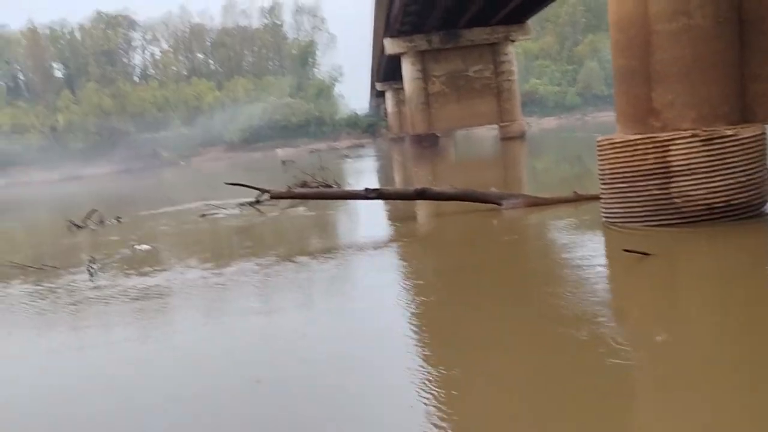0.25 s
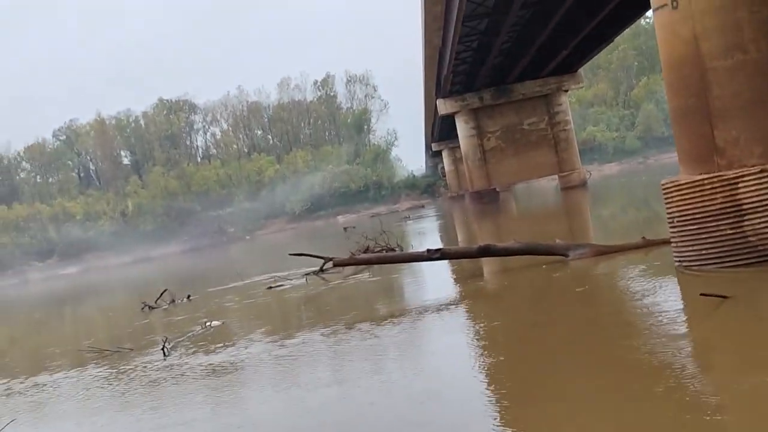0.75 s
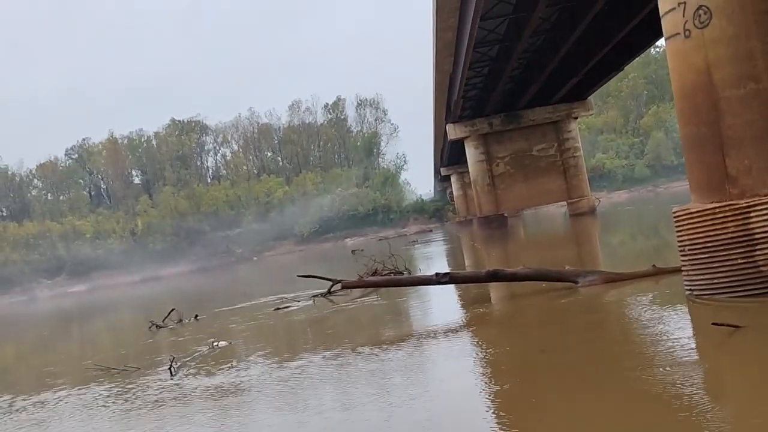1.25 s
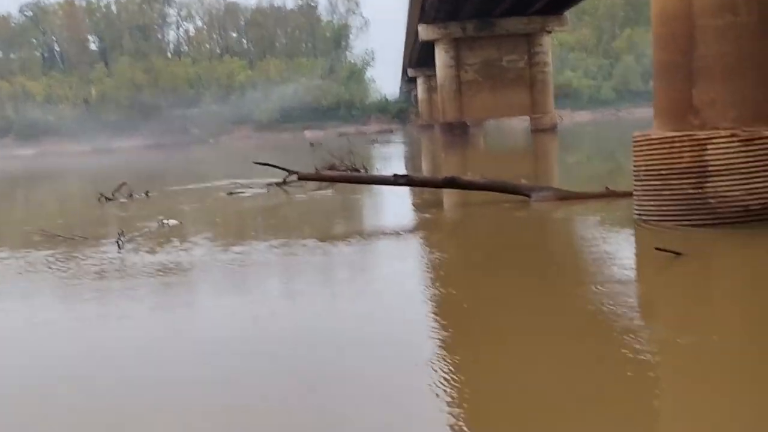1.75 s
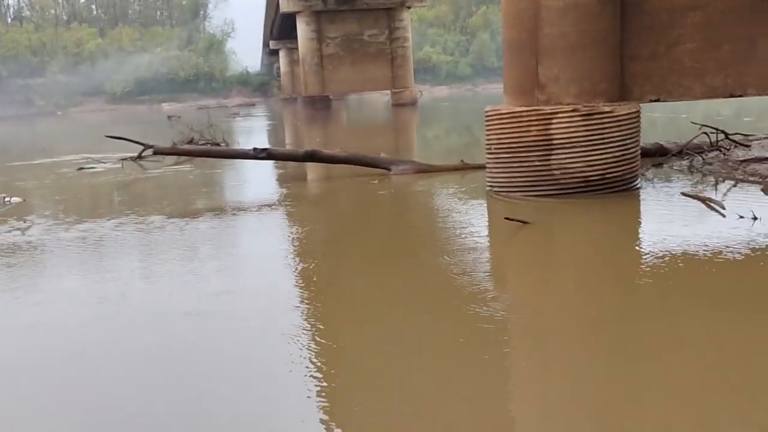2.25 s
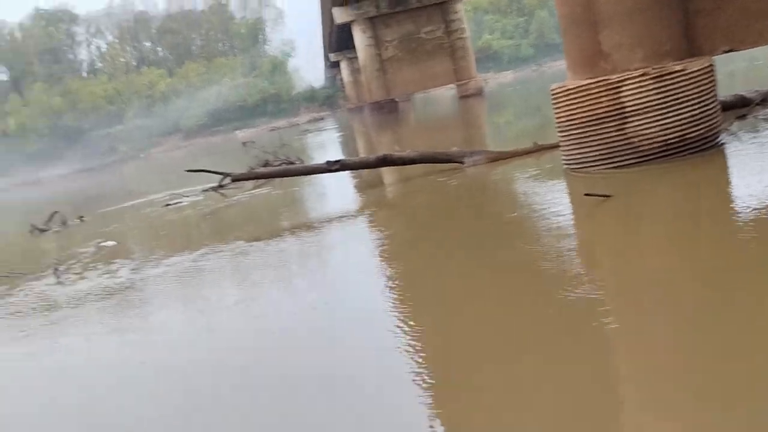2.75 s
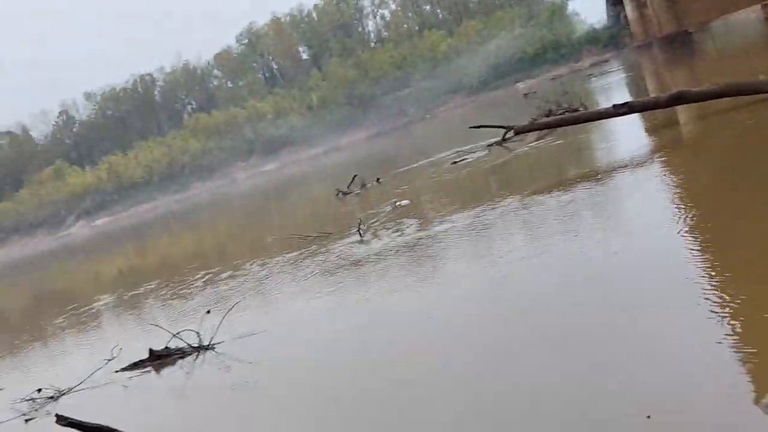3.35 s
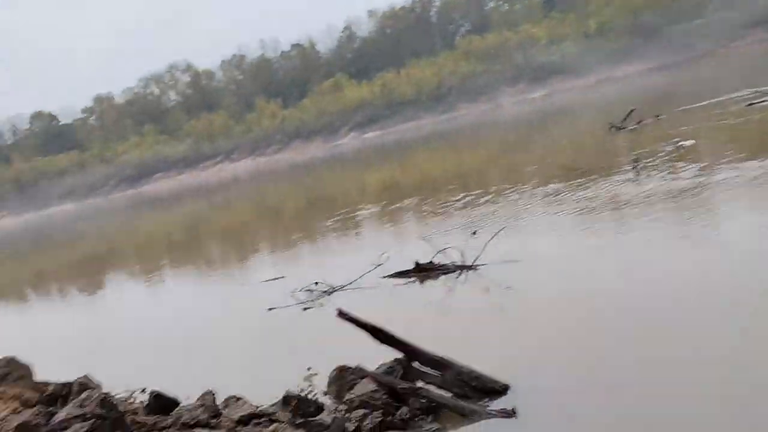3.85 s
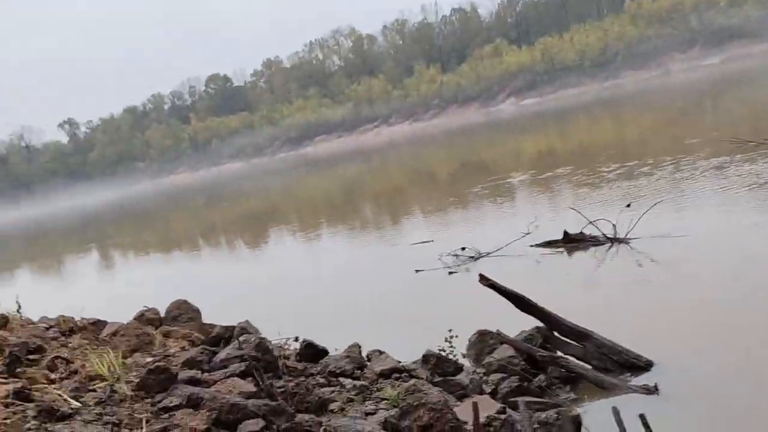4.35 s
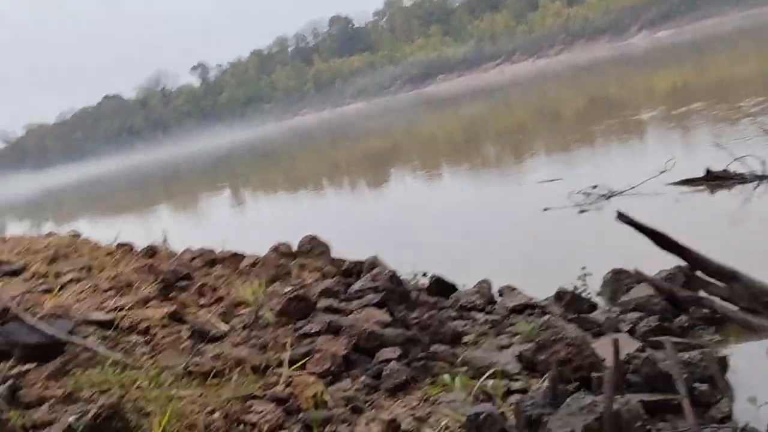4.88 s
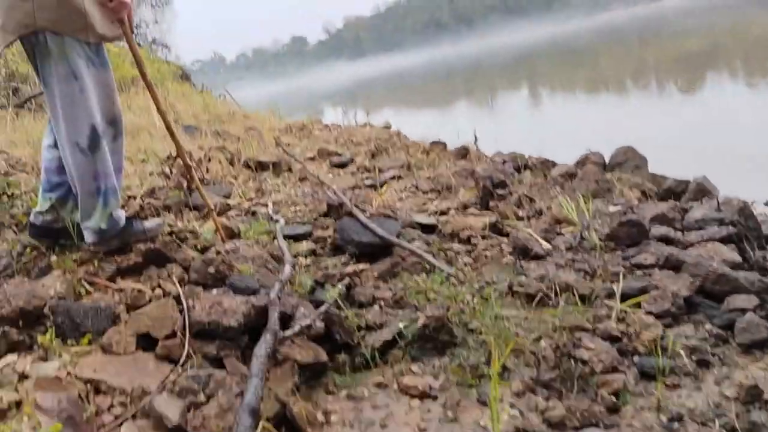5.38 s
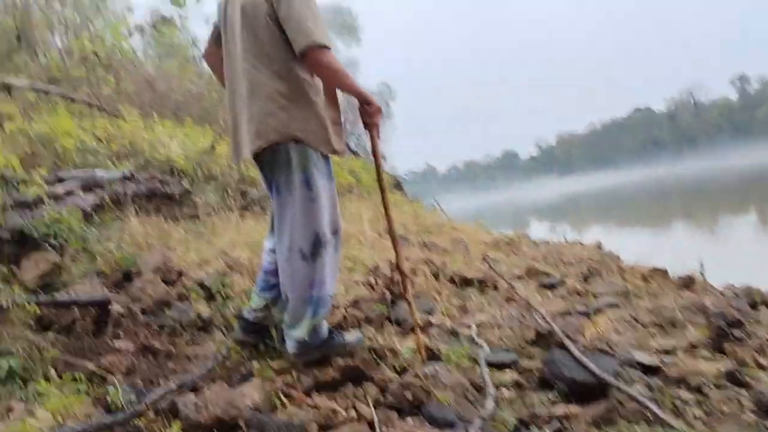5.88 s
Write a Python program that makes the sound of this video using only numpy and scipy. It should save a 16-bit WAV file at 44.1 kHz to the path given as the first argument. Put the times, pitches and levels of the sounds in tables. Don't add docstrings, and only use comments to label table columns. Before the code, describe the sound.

Deep hollow rumble and tyre hum of a truck passing on a bridge, fading away; near the end, sharp dull knocks on rocks close by.

```python
import sys
import numpy as np
from scipy import signal
from scipy.fft import rfft, irfft, next_fast_len
from scipy.io import wavfile
from scipy.ndimage import uniform_filter1d, minimum_filter1d

SR = 44100
rng = np.random.default_rng(int(sys.argv[2]) if len(sys.argv) > 2 else 0)


def elevation(decibels):
    levels = np.asarray(decibels, float)
    return 10 ** (levels / 20)


def transcribe(signal):
    frames = np.atleast_2d(signal).T
    limited = np.clip(frames, -1, 1)
    pcm = np.round(limited * 32767).astype(np.int16)
    wavfile.write(sys.argv[1], SR, pcm)


N = 269945
PORT_LAG_S = 0.00029


def curves(table):
    s, *columns = np.transpose(table)
    return [np.interp(np.arange(N) / SR, s, c) for c in columns]


def on_log(hz, points):
    f, v = np.transpose(points)
    return np.interp(np.log(hz), np.log(f), v)


def walk(rate):
    steps = np.repeat(rng.standard_normal(int(N / SR * rate) + 2), 8)
    smooth = uniform_filter1d(uniform_filter1d(steps, size=8), size=8)
    return 1.3 * np.interp(np.arange(N) * (8 * rate / SR), np.arange(len(steps)), smooth)


# (frequency [Hz], share in common [0-1])
PORT_LIKENESS = [(30, .96), (70, .99), (200, .97), (400, 0.97), (700, 0.83), (1400, 0.29), (2500, 0.037),
                 (5000, 0.14)]
# (frequency [Hz], left minus right [dB])
PORT_BALANCE = [(400, 0), (800, 2), (2400, -1), (5500, 0), (7000, -4.5), (8800, -28), (11000, -68),
                (14500, -49)]


def ports(left, other, hz):
    share = np.clip(on_log(hz, PORT_LIKENESS), 0, 1)
    right = share * left + np.sqrt(1 - share ** 2) * other
    pan = elevation(on_log(hz, PORT_BALANCE))
    late = np.exp(-2j * np.pi * hz * PORT_LAG_S)
    return np.array([left * pan * late, right]) * np.sqrt(2 / (1 + pan ** 2))


# (lower edge [Hz], upper edge [Hz])
BANDS_HZ = [(25, 56), (64, 180), (220, 420), (720, 900), (1200, 2800), (3900, 5800), (7600, 11000)]
# (time [s], level against the closest moment [dB])
NEARNESS = [(0, -9), (.12, -6), (.3, -3), (.6, -3), (.9, -.5), (1.55, 0), (1.9, -0.5), (2.6, -1.5),
            (3.1, -3.5), (3.6, -5.5), (4.2, -8), (4.5, -11.5), (5.0, -15.5), (5.5, -17), (6.12, -22)]
# (level at the closest [dB], share of nearness, drift [dB per s],
# distant floor [dB], share of puffs)
LAYERS = [
    (-52.5, .1, -2, -80, 0),
    (-25, 0.27, -1.81, -60, 0),
    (-25.5, 0.86, -0.58, -71, 0),
    (-36.5, 0.99, 0.25, -71, 0.0033),
    (-37, 1.145, -0.88, -54, 0.22),
    (-50, 0.84, -1.05, -72.5, 0.55),
    (-43.2, 1.74, -0.97, -70.5, 1.27),
]
# (time [s], boom level [dB])
JOINTS = [(.14, -24), (.3, -19.5), (.36, -15), (.42, -17), (.52, -16.5), (.68, -13.5), (.75, -16.5),
          (.81, -19), (.89, -22), (.98, -23), (1.33, -22), (1.5, -40), (1.6, -27), (1.98, -34), (2.2, -25),
          (2.52, -46), (2.71, -37), (2.88, -33), (3.07, -31), (3.51, -25.5), (4.04, -31), (4.28, -32.5),
          (4.41, -35), (4.51, -39), (4.59, -42), (4.67, -29), (5.05, -36), (5.51, -36), (5.85, -43)]
JOINT_DB = [-39.5, -1.8, -16.5]
# (time [s], change [dB], centre [Hz], breadth [octaves])
SCREENS = [(2.815, -6, 9550, 0.77), (3.89, -3, 4306, 2.9), (4.7, -4.5, 254, 0.64), (4.2, 2.6, 800, .4),
           (5.1, -2.5, 800, .4)]
# (time [s], lift [dB], length [s])
PUFFS = [(3.35, 1.5, .12), (.3, -1.5, .1), (1.59, 2, 0.35), (.8, -0.5, 0.065), (2.35, 1.5, 0.055),
         (2.6, 2, 0.046), (2.76, 1, 0.046), (3.8, 3.5, 0.13), (4.194, 2, 0.13), (4.599, 3.5, .06),
         (4.9, 7, 0.031), (5.426, 7, 0.21), (6.052, 2, 0.084)]


def layer_levels():
    joint_s, screen_s = 0.039, 0.013
    every = 32
    t = np.arange(0, N, every) / SR
    near, = curves(NEARNESS)
    jolts = sum(elevation(2 * db) * np.exp(-((t - s) / joint_s) ** 2) for s, db in JOINTS)
    puffs = sum(db * np.exp(-((t - s) / length) ** 2) for s, db, length in PUFFS)
    levels = []
    for k, (db, follow, drift_db, floor_db, puffy) in enumerate(LAYERS):
        octave = np.log2(BANDS_HZ[k]).mean()
        screen = 0
        for s, change_db, hz, breadth in SCREENS:
            touched = np.exp(-((octave - np.log2(hz)) / breadth) ** 2)
            passed = (1 + np.tanh((t - s) / screen_s)) / 2
            screen = screen + change_db * touched * passed
        truck_db = db + follow * near[::every] + drift_db * t + screen
        power = elevation(2 * truck_db) + elevation(2 * floor_db)
        if k < len(JOINT_DB):
            power = power + jolts * elevation(2 * JOINT_DB[k])
        level_db = 10 * np.log10(power) + puffy * puffs
        levels.append(np.interp(np.arange(N) / SR, t, level_db))
    return levels


# (frequency [Hz], level [dB per Hz])
ROAD_COLOUR = [(15, -26), (25, -42), (38, -29), (50, -40), (58, -15), (66, -15.5), (85, -7), (139, -6.5),
               (180, -7.5), (290, -9), (510, -14), (620, -20), (1000, -22), (1150, -28),
               (1500, -28), (2000, -31.5), (2900, -39), (3700, -49.5), (5800, -51), (7200, -47.5), (8900, -40.5),
        (10200, -48), (12500, -57), (14300, -59.5), (17000, -66)]
# (frequency [Hz], width [Hz], level over the rumble [dB])
GIRDERS = [(96.6, 14, 2), (121, 12, 4.5), (152, 5, 3), (298, 9, 9), (431, 25, 2)]


def road():
    size = next_fast_len(N)
    hz = np.maximum(np.arange(size // 2 + 1) * SR / size, 1)
    gain = elevation(on_log(hz, ROAD_COLOUR))
    for f, width, db in GIRDERS:
        gain = gain * (1 + (elevation(db) - 1) / (1 + (2 * (hz - f) / width) ** 2))
    noise = ports(*rfft(rng.standard_normal((2, size))), hz) * gain
    power = np.mean(np.abs(noise) ** 2, axis=0) / size ** 2
    out, gust = 0, walk(9)
    for k, db in enumerate(layer_levels()):
        lo, hi = BANDS_HZ[k]
        rms = np.sqrt(2 * power[(hz > lo) & (hz < hi)].sum())
        share = on_log(hz, [(edge, j == k) for j, band in enumerate(BANDS_HZ) for edge in band])
        flicker_db = 0.72 * walk(12) + 0.056 * k * gust
        out = out + irfft(noise * share, size)[:, :N] * elevation(db + flicker_db + 1) / rms
    return out


def smeared_line(hz, spread, rate=40, flutter_db=3):
    level = np.sqrt(2) * elevation(flutter_db * walk(25))
    cycles = np.cumsum(hz * (1 + spread * walk(rate))) / SR
    return level * np.sin(2 * np.pi * (cycles + rng.random()))


# (time [s], pitch [Hz], level [dB], octave level [dB])
TREAD = [(0, 557.3, -49, -68), (.55, 543.9, -39, -45), (1, 524, -34, -40), (1.5, 511.7, -33, -39),
         (2, 505.7, -33.5, -40), (2.4, 504, -35, -56), (2.7, 502, -29, -58), (2.9, 502, -36, -60),
         (3.1, 510, -33, -60), (3.45, 500, -37, -56), (3.58, 473, -45, -43), (3.8, 473, -44, -47),
         (3.95, 474, -43, -54), (4.2, 475.8, -36, -55), (4.4, 475, -49, -53), (4.7, 474, -48, -47),
         (4.85, 474, -44, -49), (5.0, 476, -37.5, -49), (5.2, 476, -37.5, -51), (5.35, 475, -46, -53),
         (5.55, 474, -43, -53), (5.8, 474, -45, -56), (6.12, 472, -55, -64)]


def tread():
    hz, db, octave_db = curves(TREAD)
    spread_near, spread_far, agree_s, agree_within_s = .04, 0.008, 2.45, 0.129
    t = np.arange(N) / SR
    spread = spread_far + (spread_near - spread_far) / (1 + np.exp((t - agree_s) / agree_within_s))

    def with_echoes(pitch, spread, flutter_db):
        return sum(elevation(-7 * k) * smeared_line(pitch, spread, flutter_db=flutter_db) for k in range(3))

    hum = with_echoes(hz, spread, 2.8) * elevation(db - 3.3)
    octave = [with_echoes(2 * hz, .9 * spread, 3) * elevation(octave_db - 1.5) for _ in range(2)]
    return np.array([np.roll(hum, int(PORT_LAG_S * SR)), hum]) + octave


# (time [s], level [dB], left minus right [dB])
WHISTLE = [(0, -57.5, -17), (.3, -56, -20), (.7, -48.5, -14), (1.1, -45, -5), (1.5, -51, -12.5),
           (2.1, -56.5, -11), (2.7, -64.5, -6), (3.6, -66, -4), (3.75, -76, -2), (3.95, -68.5, -4),
           (5.1, -73, -3), (6.12, -82, -3)]


def whistle(count=9):
    far_hz, drop_least, drop_most = 6225, .1, .185
    first_s, last_s, sweep_s = .62, 1.15, .52
    early_db, far_spread = -4, .0075
    rev_share, rev_s = .008, 3.85
    db, pan_db = curves(WHISTLE)
    t, out = np.arange(N) / SR, np.zeros((2, N))
    rev = 1 + rev_share * (1 + np.tanh((t - rev_s) / .15)) / 2
    for k, late in enumerate(np.linspace(0, 1, 2 * count)):
        ahead = (first_s + late * (last_s - first_s) - t) / sweep_s
        drop = drop_least + (drop_most - drop_least) * late ** .7
        hz = far_hz * rev * (1 + drop * (1 + ahead / np.sqrt(1 + ahead ** 2)) / 2)
        spread = far_spread + 0.013 / (1 + ahead ** 2)
        out[k % 2] += elevation(early_db * (1 - late)) * smeared_line(hz, spread, rate=150)
    return out / np.sqrt(count) * elevation(db + 2.6 + np.array([pan_db, -pan_db]) / 2)


def add(out, s, sound, pan_db):
    i = int(s * SR)
    panned = sound * elevation(np.array([[pan_db], [-pan_db]]) / 2)
    out[:, i:i + sound.shape[-1]] += panned[:, :N - i]


def crack(hz, octaves, t60, rise, channels, ring=0., tick=0., noisy=1.):
    t = np.arange(SR // 6) / SR
    half = 2 ** (np.clip(octaves, .05, 4) / 2)
    band = signal.butter(2, [hz / half, min(hz * half, 18000)], "band", fs=SR, output="sos")
    noise = signal.sosfilt(band, rng.standard_normal((channels, 2 * len(t))))[:, len(t):]
    early = noise[:, :SR // 300]
    body = noisy * noise / np.sqrt(np.mean(early ** 2)) + ring * np.sin(2 * np.pi * hz * t)
    contact = signal.sosfilt(band, 1. * (t == 0))
    fade = elevation(-60 * t / max(t60, .003))
    swell = 1 - np.exp(-t / max(rise, .0002))
    return (body * swell + tick * contact / np.abs(contact).max()) * fade


GRIT_HZ = 8820
# (time [s], peak level [dB], breadth [octaves])
GRIT = [(.1336, -46, .5), (2.2877, -44, .4), (3.04, -52, .3), (3.425, -53, .3), (3.58, -53, .4),
        (5.683, -62, .5), (.3142, -40, .5), (1.0604, -37, .5), (2.0961, -43, .4), (2.619, -43, .4),
        (2.9995, -50, .4), (3.3246, -56, .2), (3.3388, -50, .12), (3.894, -55, .6), (4.1734, -54, .7),
        (4.3994, -59, .5), (4.7546, -52.5, .5), (4.8902, -61, .4), (5.1844, -62, .3), (5.1999, -57, .3),
        (5.5157, -60, .3), (5.5715, -60, .6), (5.5852, -48, .5), (5.6613, -55, .6), (5.8217, -52.5, .25),
        (5.9695, -61, .4), (5.9774, -55, .6)]


def grit():
    t60_s, rise_s, pan_db = 0.021, 0.00093, -23.5
    out = np.zeros((2, N))
    for s, db, octaves in GRIT:
        sound = crack(GRIT_HZ, octaves, t60_s, rise_s, channels=2, tick=0.7)
        add(out, s, sound * elevation(db - 1.5), pan_db)
    return out


# (time [s], level [dB])
DRONE = [(0, -60), (.4, -16.5), (.55, -47.5), (.68, -25), (.78, -18), (.86, -22.5), (1, -34), (1.6, -34),
         (2.3, -42), (3, -33.5), (3.3, -39), (3.55, -31), (4.0, -35.5), (4.18, -41), (4.28, -30),
         (4.45, -31), (4.66, -32), (4.8, -41), (5.05, -37), (5.3, -37.5), (5.7, -42), (6.12, -50)]


def drone():
    db, = curves(DRONE)
    return smeared_line(np.full(N, 148.95), 0.004, flutter_db=2.2) * elevation(db)


# (time [s], peak level [dB], ring pitch [Hz], time to fall 60 dB [s], breadth [octaves])
BLOWS = [(3.4765, -22, 800, 0.012, 1.2), (5.2127, -38, 12000, 0.005, .6), (5.2136, -37, 7500, .006, 1.0),
         (5.2146, -20.5, 1500, 0.007, 0.9), (5.2146, -30, 3600, 0.006, 1.2), (5.236, -45, 5500, .051, 1.4),
         (5.3008, -38, 12000, .006, .9), (5.328, -53, 4000, .06, 1.8), (5.3058, -28, 900, .013, 1.2),
         (5.3068, -31, 2300, .01, 1.1), (5.3074, -40, 5000, .008, .5), (5.3421, -11, 700, .0095, 1.0),
         (5.3428, -25, 1500, .007, 1.1), (5.3436, -27, 2800, .008, 1.1), (5.338, -50, 5500, .05, 1.5),
         (5.3492, -21, 500, 0.03, 1.1), (5.352, -23, 950, .015, 1.2), (5.3518, -35, 5300, 0.026, 0.3),
         (5.357, -41, 4200, .05, 1.3), (5.2355, -34, 900, .008, 1.1), (5.572, -56, 5500, .03, .6),
         (5.62, -54, 4500, .012, .3), (5.3528, -31, 2300, 0.018, 1.5), (5.5859, -37, 13000, 0.005, 1.0),
         (5.5868, -35, 5500, 0.015, 0.25), (5.5864, -41, 8000, .012, .8), (5.5868, -31, 1100, 0.011, 1.5),
         (5.5866, -41, 3500, .01, 1.2), (5.6621, -47, 5000, .012, 2.1), (5.6625, -42, 1300, .01, 1.2)]


def knocks():
    longest_t60_s, rise_cycles, ring_width_hz = .06, .45, 2600
    out = np.zeros((2, N))
    for s, db, hz, t60, octaves in BLOWS:
        pan_db = 3 + 3.5 * np.log2(hz / 1000)
        clean = 1 / (1 + (hz * octaves / ring_width_hz) ** 2)
        sound = crack(hz, octaves, min(t60, longest_t60_s), rise_cycles / hz, channels=1,
                      ring=1.2 * clean, tick=0.7 * (1 - clean), noisy=.75 - .62 * clean)
        add(out, s, sound * elevation(db), pan_db)
    return out


# (time [s], peak level [dB], time to fall 60 dB [s])
SCRAPE = [(5.2132, -35, 0.0092), (5.235, -41.5, .045), (5.25, -43, .029), (5.262, -54, 0.14),
          (5.3012, -33, .005), (5.305, -47, .04), (5.326, -52, 0.12), (5.339, -47, .06),
          (5.349, -37.5, .03), (5.36, -46, .04), (5.372, -66, 0.14), (5.398, -53, .03)]


def scrape():
    octaves, rise_share, pan_db = .46, 0.084, -16
    out = np.zeros((2, N))
    for s, db, t60 in SCRAPE:
        sound = crack(GRIT_HZ, octaves, t60, rise_share * t60, channels=2, tick=0.3)
        add(out, s, sound * elevation(db), pan_db)
    return out


def scene():
    top_hz, hiss_db = 14280, -72.5
    far = road() + drone() + tread() + whistle() + grit() + scrape()
    far = far + elevation(hiss_db) * rng.standard_normal((2, N))
    steep = signal.ellip(8, .2, 45, top_hz, fs=SR, output="sos")
    gentle = signal.butter(5, top_hz, fs=SR, output="sos")
    return signal.sosfilt(steep, far) + signal.sosfilt(gentle, knocks())


# (time [s], rise of the gate [dB])
LOSSES = [(.2, 4), (.47, 4), (.84, 4), (1.59, 5), (4.52, 5), (5.02, 4), (5.23, 4), (5.29, 4), (5.39, 6),
          (5.51, 5), (5.58, 4), (5.87, 5), (6.03, 4)]
# (frequency [Hz], level against the neighbouring lines [dB])
GATE = [(1200, -22), (2200, -12), (3400, -3), (5400, -1), (6300, -7.5), (8800, -14), (10500, -8),
        (12000, -3), (14000, 0.1)]


def thin_treble(dry):
    scatter_db, loss_s = 4.5, .022
    pad = 486
    window = np.sin(np.pi * (np.arange(2048) + .5) / 2048)
    frame = dict(window=window, nperseg=2048, noverlap=1024)
    hz, t, lines = signal.stft(np.pad(dry, [(0, 0), (pad, 0)]), SR, **frame)
    around = np.sqrt(uniform_filter1d(np.abs(lines) ** 2, size=48, axis=1))
    level = minimum_filter1d(around, size=5)
    rise_db = sum(db * np.exp(-((t - pad / SR - s) / loss_s) ** 2) for s, db in LOSSES)
    patches = np.sqrt(2) * uniform_filter1d(rng.standard_normal((129, len(t))), size=2)
    scatter = np.repeat(patches, 8, axis=0)[:len(hz)]
    gate_db = on_log(np.maximum(hz, 1), GATE)[:, None] + scatter_db * scatter + rise_db
    kept = lines * (np.abs(lines) > level * elevation(gate_db))
    return signal.istft(kept, SR, **frame)[1][:, pad:pad + N]


def roll_off(x):
    return signal.sosfilt(signal.butter(12, 15600, fs=SR, output="sos"), x)


def record(dry):
    mix = thin_treble(dry)
    return roll_off(mix)


dry = scene()
out = record(dry)
transcribe(out)
```